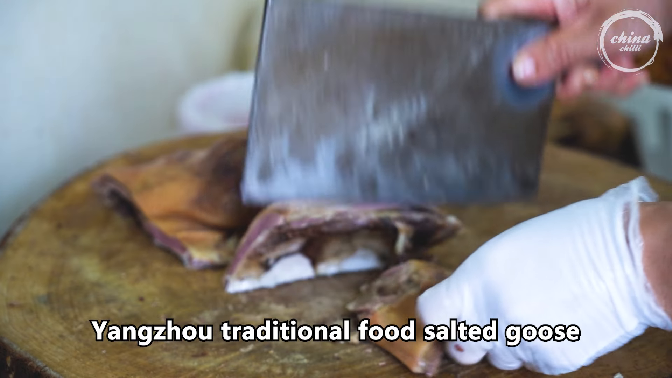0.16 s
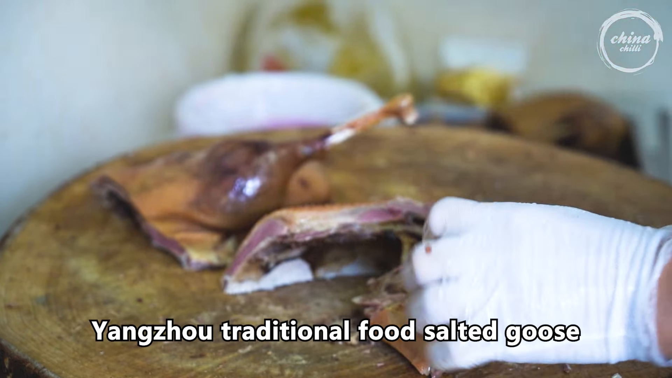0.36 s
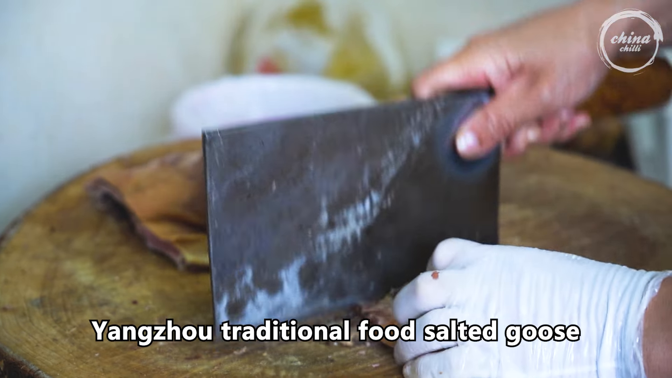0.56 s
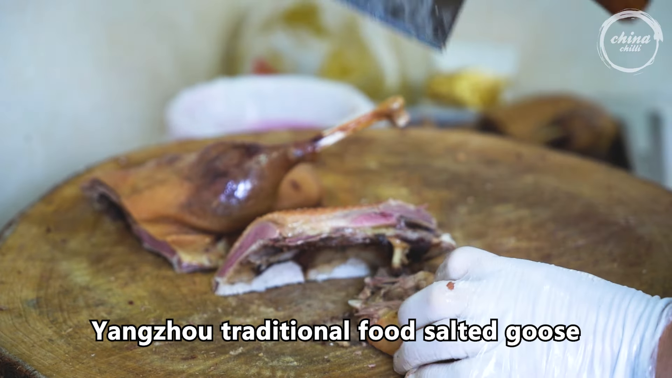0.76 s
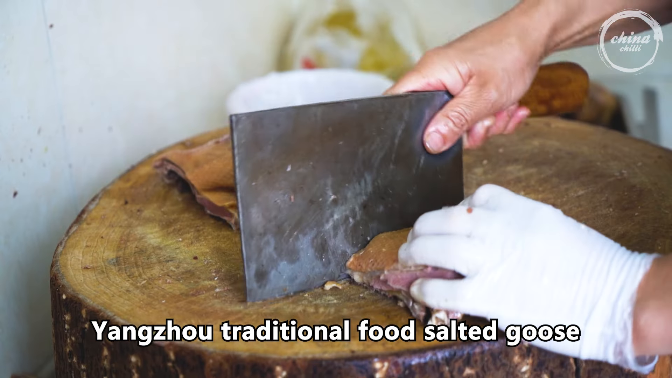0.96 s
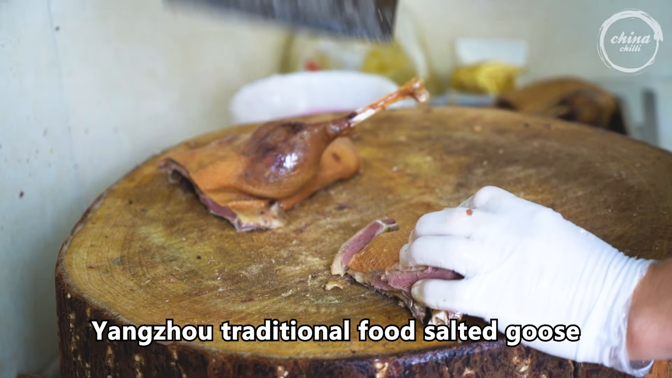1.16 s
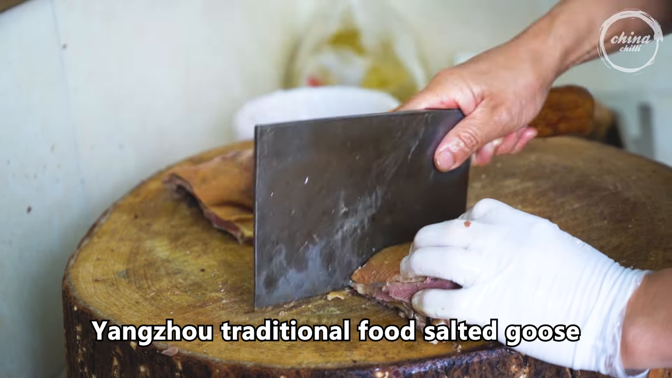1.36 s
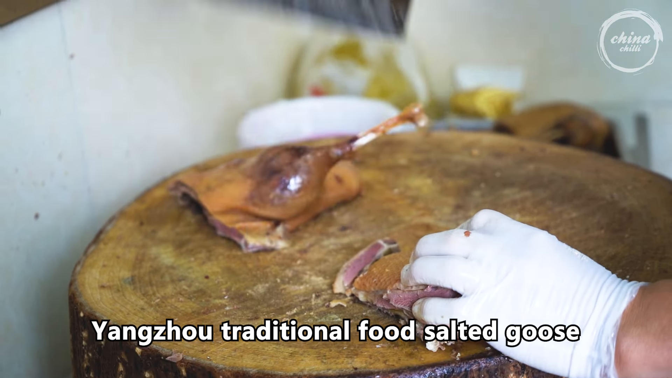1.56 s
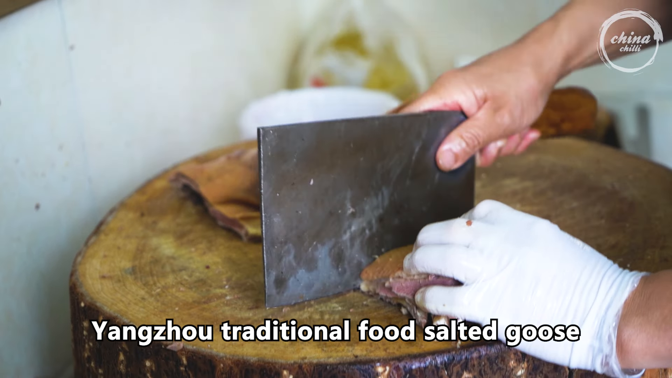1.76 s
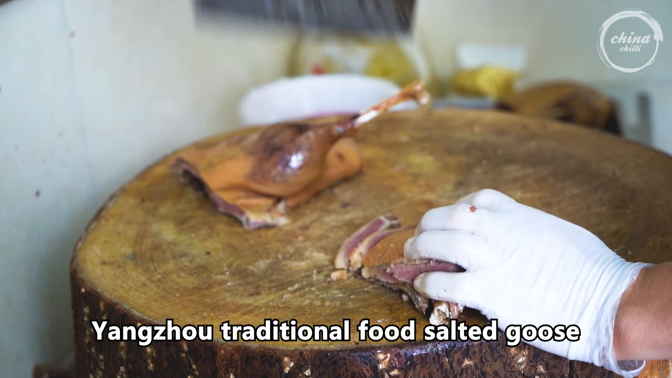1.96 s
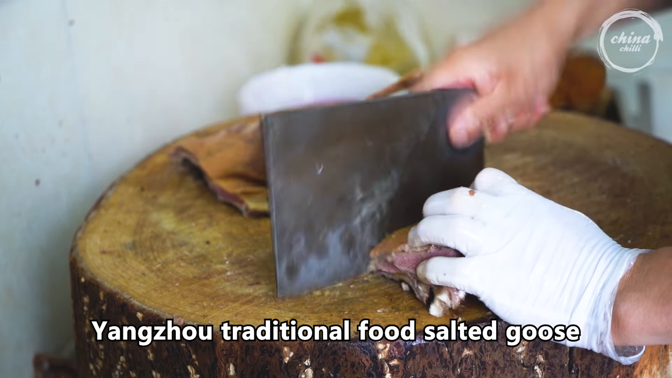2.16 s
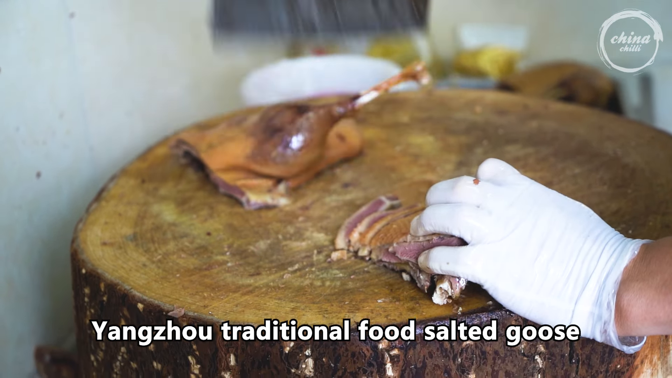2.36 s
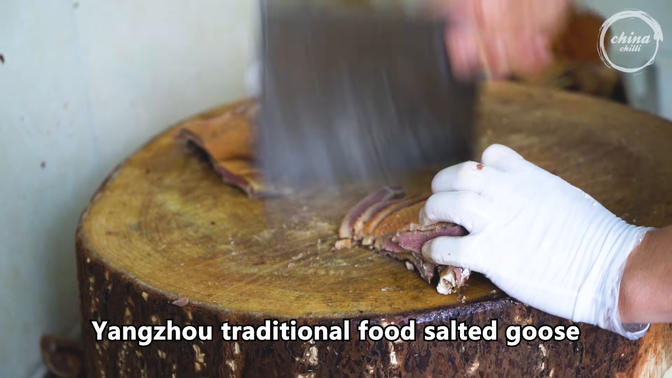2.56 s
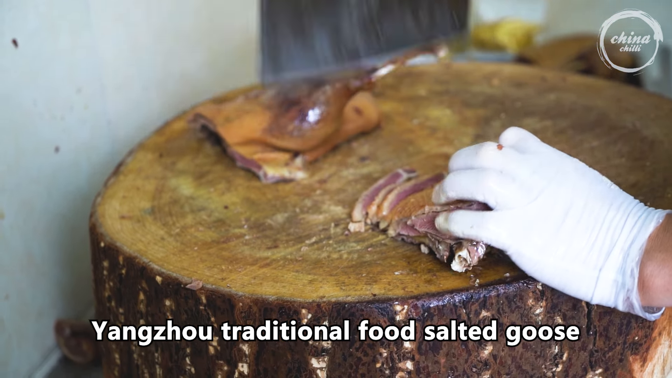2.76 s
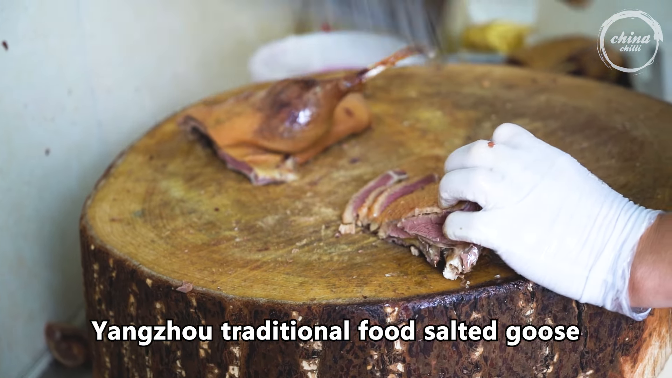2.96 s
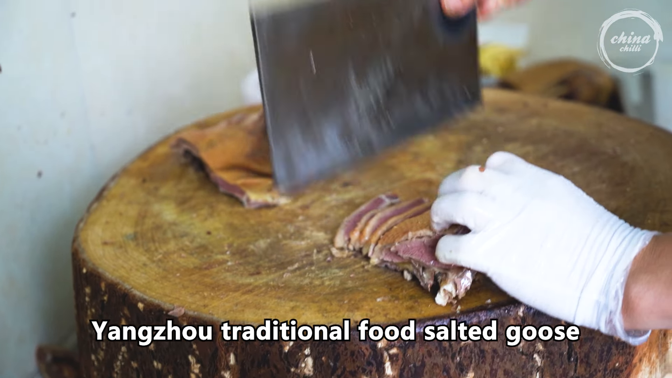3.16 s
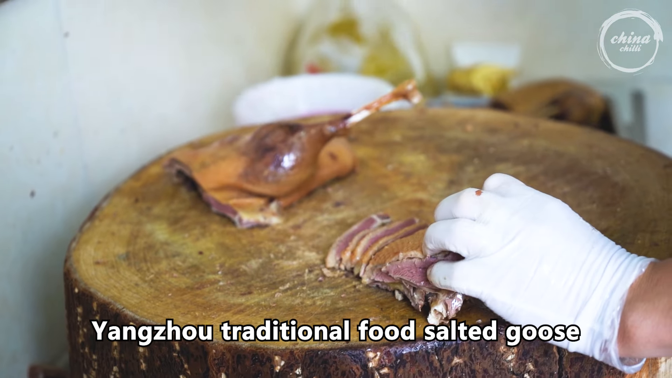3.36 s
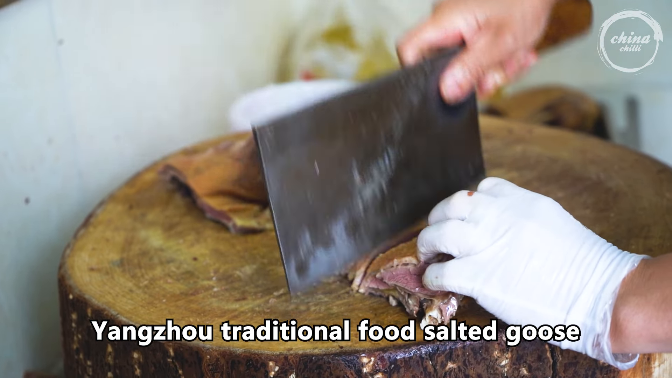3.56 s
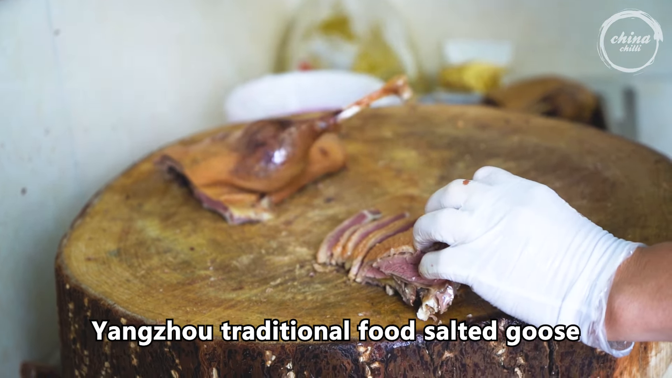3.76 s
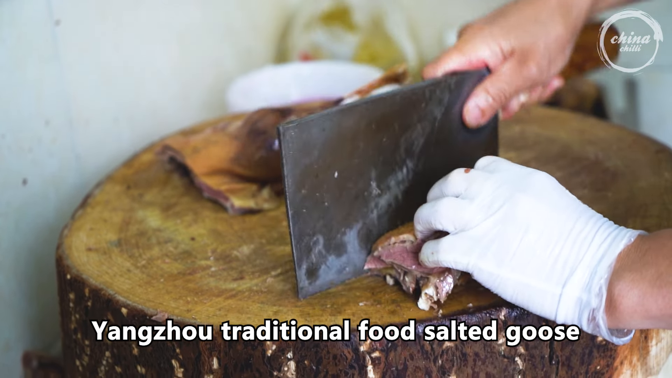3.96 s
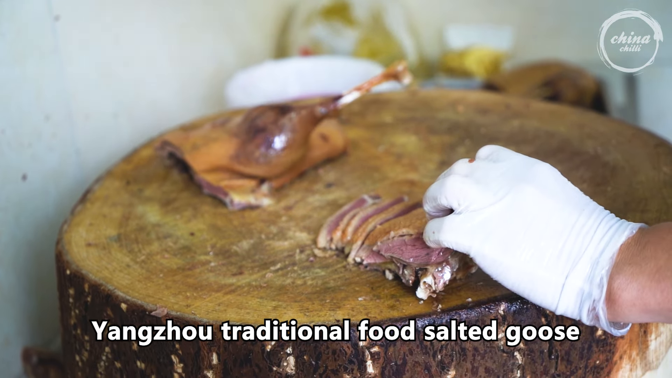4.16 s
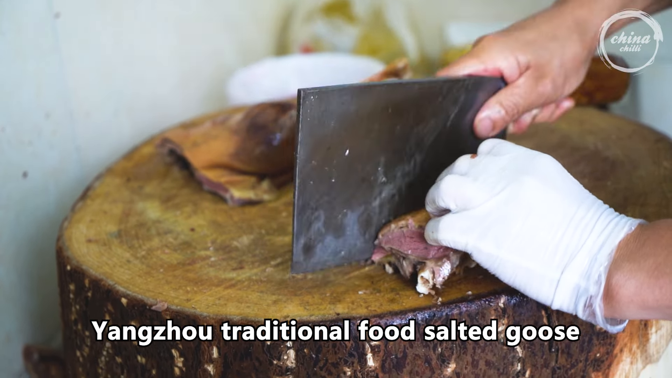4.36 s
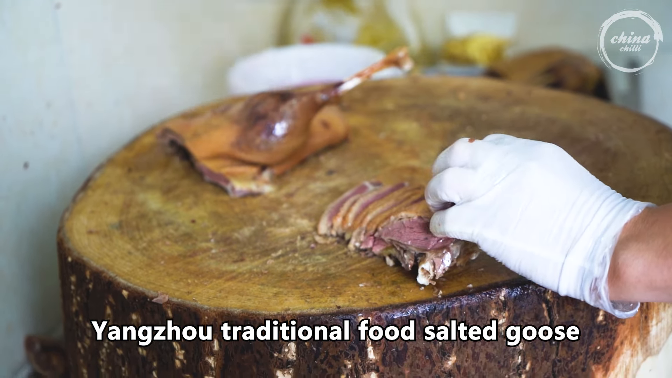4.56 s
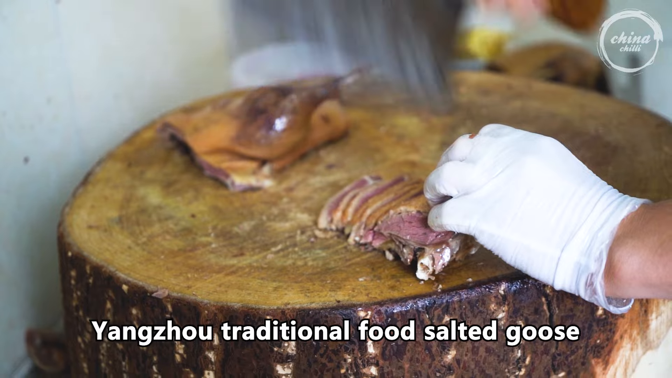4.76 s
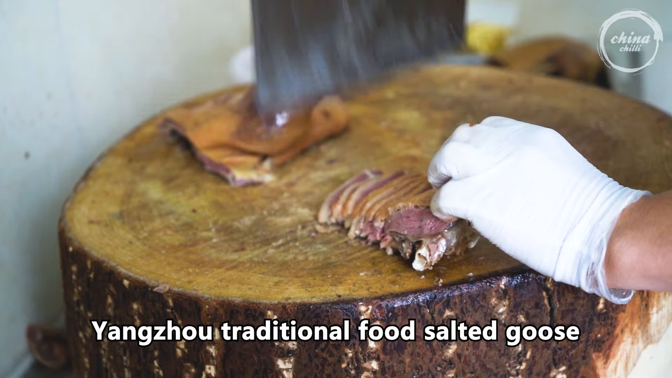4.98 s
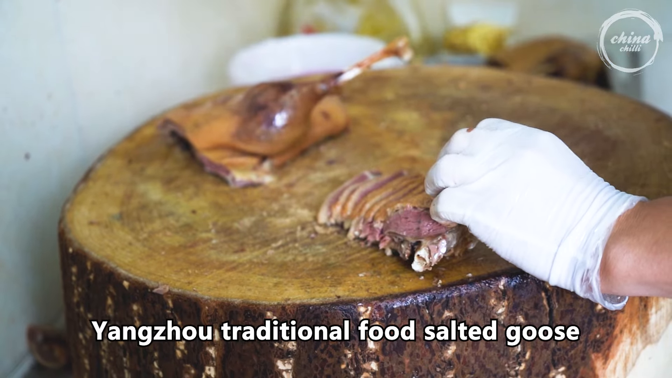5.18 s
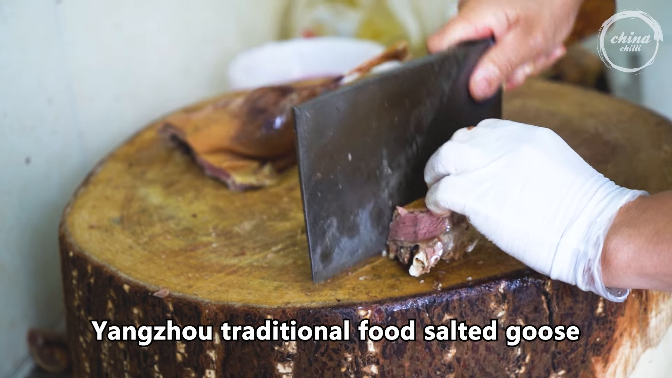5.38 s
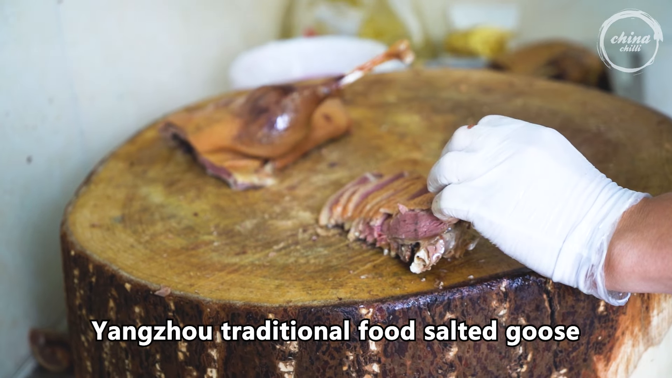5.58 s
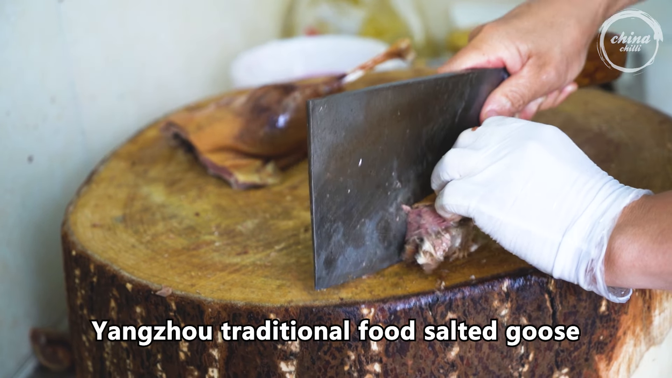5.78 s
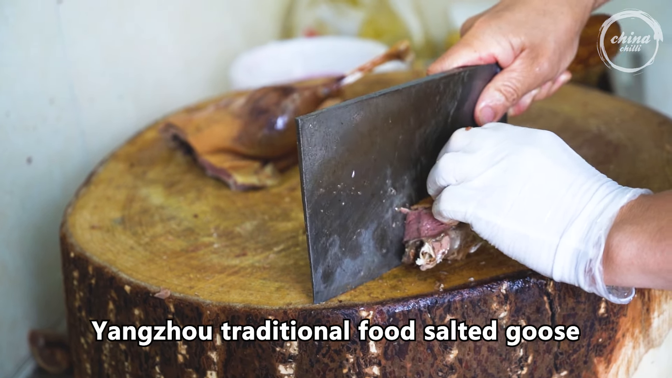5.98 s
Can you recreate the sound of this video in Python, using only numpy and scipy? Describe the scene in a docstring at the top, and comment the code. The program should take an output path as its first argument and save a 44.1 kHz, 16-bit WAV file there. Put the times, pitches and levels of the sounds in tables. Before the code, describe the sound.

A close stereo take in a small hard-walled stall, with a soft, steady bed of air noise. From 0 to 0.4 seconds the lifted blade gives faint thin steel clinks, with a light tap and a wet slide on wood. The first heavy cleaver blow lands at about 0.5, then strokes follow roughly every 0.4 to 0.5 seconds, thirteen in all, the last near 5.8. Each starts with a tiny crunch through meat, then a sharp bone crack and hard knock on the thick block, brief ringing of wood and steel, and echoes gone within about a third of a second. Blows near 1.4 and 2.6 are hollower and woodier; others are brighter and more splintery. Quiet wet rubs and set-downs fall between, most noticeable at 2.8 and from 3.4 to 3.9. The impacts are loud enough to clip.

```python
"""A heavy cleaver chops bone-in goose on a thick wooden block, thirteen strokes in a small hard-walled stall.
Each stroke is shaped noise for the crunch, bone snap and blow, with damped sines for wood and steel.
Around the strokes, swelling wet noise makes pieces set down and slid, and faint sines make the steel clink.
A soft bed of air noise drifts behind. The blows overload a close stereo microphone and clip."""
import sys
import numpy as np
from scipy import signal
from scipy.fft import rfft, irfft, next_fast_len
from scipy.io import wavfile
from scipy.ndimage import map_coordinates

SR = 44100
rng = np.random.default_rng(int(sys.argv[2]) if len(sys.argv) > 2 else 0)


def unload_audio(sound):
    """Save the sound as a 16-bit wav file, at the path given as the first command line argument."""
    columns = np.transpose(np.atleast_2d(sound))
    # keep every value between -1 and 1, then stretch to whole-number steps
    steps = np.round(np.clip(columns, -1, 1) * 32767)
    wavfile.write(sys.argv[1], SR, steps.astype(np.int16))


N = 265482
SPAN = 3 * SR // 4  # samples in one event
LEAD = SR // 20  # samples kept ahead of each contact
T = (np.arange(SPAN) - LEAD) / SR  # time since contact, s
AFTER = np.maximum(T, 0)


def amp(db):
    """Decibels to gain."""
    return 10 ** (np.asarray(db) / 20)


def unit(x):
    """Scale to rms 1."""
    return x / np.sqrt(np.mean(x ** 2) + 1e-20)


def along(points, hz):
    """Read a curve of (Hz, value) points on a log-frequency axis."""
    f, v = np.transpose(points)
    return np.interp(np.log(hz + 1), np.log(f + 1), v)


def hump(f, hz, db, octaves):
    """A bell of db around hz on a log-frequency axis."""
    return db * np.exp(-(np.log2(f / hz) / octaves) ** 2)


def peaked(points, hz, db, octaves):
    """A spectrum with a resonant hump of db added around hz."""
    grid = np.geomspace(points[0][0], points[-1][0], 120)
    return np.transpose([grid, along(points, grid) + hump(grid, hz, db, octaves)])


def splintered(points, depth_db):
    """Roughen a spectrum at random: every piece has its own uneven set of resonances."""
    grid = np.geomspace(points[0][0], points[-1][0], 70)
    return np.transpose([grid, along(points, grid) + depth_db * rng.standard_normal(len(grid))])


def filtered(x, response):
    """Filter x by a response given as a function of frequency."""
    n = x.shape[-1]
    padded = next_fast_len(n + 4096)
    return irfft(rfft(x, padded) * response(np.fft.rfftfreq(padded, 1 / SR)), padded)[..., :n]


def add(track, s, sound):
    """Mix a sound in with its contact at time s."""
    start = round(s * SR) - LEAD
    part = sound[:, max(-start, 0):N - start]
    track[:, max(start, 0):][:, :part.shape[1]] += part


def fade(t60):
    """Die away by 60 dB in t60 seconds after the contact."""
    return np.exp(-np.log(1000) * AFTER / t60)


def grains(rate, depth_db):
    """A crackling gain of rms 1, gliding in dB between random levels set `rate` times a second."""
    knots = rng.standard_normal(SPAN)
    level = np.interp(np.arange(SPAN) * rate / SR, np.arange(SPAN), knots)
    return unit(amp(depth_db * level))


def rush(layers, alike, size=SPAN):
    """Stereo noise made of (spectrum, rms dB) layers; mid and side share it to set left-right likeness."""
    hz = np.fft.rfftfreq(size, 1 / SR)
    power = 0
    for shape, db in layers:
        top_hz = shape[-1][0]
        response = amp(along(shape, hz)) / (1 + (hz / top_hz / 2) ** 2)
        power = power + (amp(db) * unit(response)) ** 2
    turn = np.arccos(np.clip(along(alike, hz), -1, 1)) / 2
    noise = rfft(rng.standard_normal((2, size)))
    mid, side = irfft(noise * np.sqrt(power) * [np.cos(turn), np.sin(turn)], size)
    return np.array([mid + side, mid - side])


# Stereo width of the stall. Each row: frequency in Hz, left-right likeness (1 is identical).
STEREO_LIKENESS = [(60, 0.97), (300, 0.99), (700, 0.77), (1300, 0.41), (2500, 0.033), (8000, 0.017)]


def ring(modes, scatter_db):
    """Damped (Hz, dB, t60) modes at scattered strengths; the less alike the sides, the more phases differ."""
    hz, db, t60 = np.transpose(modes)
    start, skew, strength = rng.standard_normal((len(hz), 3)).T
    spread = skew * np.sqrt(2 * abs(1 - along(STEREO_LIKENESS, hz)))
    phase = np.pi * start + np.array([[.5], [-.5]]) * spread
    gain = amp(db + strength * scatter_db)
    t = AFTER.astype(np.float32)
    angle = np.outer(np.float32(2 * np.pi * hz), t)
    decay = np.exp(np.outer(np.float32(-np.log(1000) / t60), t))
    out = (gain * np.cos(phase)) @ (np.sin(angle) * decay)
    out += (gain * np.sin(phase)) @ (np.cos(angle) * decay)
    return out * (T > 0) / np.sqrt(np.sum(gain ** 2) / 2)


# Wall echo decay. Each row: frequency in Hz, time to fall 60 dB in seconds.
STALL_DECAY = [(60, 0.69), (200, 0.29), (600, 0.35), (2000, 0.31), (6000, 0.33), (10000, .3), (15000, 0.24)]


def reverberate(noise):
    """Dense wall echoes: each frequency dies at its own speed."""
    hz, t, z = signal.stft(noise, SR, nperseg=256)
    age = np.maximum(t - LEAD / SR, 0)
    dying = np.exp(-np.log(1000) * age / along(STALL_DECAY, hz)[:, None])
    return signal.istft(z * dying, SR, nperseg=256)[1][:, :SPAN]


# Spectrum of the air around the stall. Each row: frequency in Hz, relative density in dB per Hz.
AIR_SPECTRUM = [(15, -74), (40, -37), (62, -27), (80, 1), (115, -7.5), (166, -22), (217, -4), (335, -4.5),
                (591, -4), (1520, -3.5), (4030, -11), (7310, -12.5), (14800, -20.5), (16000, -42)]
AIR_DB, AIR_DRIFT_DB, AIR_DRIFT_RATE = -47, -0.35, 1.1  # level, depth of its drift, drifts a second


def background():
    """The soft noise of air around the stall, its level drifting slowly on a random curve."""
    air = rush([(AIR_SPECTRUM, 0)], STEREO_LIKENESS, size=N)
    place = np.arange(N) * AIR_DRIFT_RATE / SR
    drift = map_coordinates(rng.standard_normal(int(place[-1]) + 4), [place])
    return amp(AIR_DB + AIR_DRIFT_DB * drift) * air


# Light clinks of the lifted steel. Each row: start in seconds, pitch in Hz, level in dB,
# time to fall 60 dB in seconds.
STEEL_CLINKS = [(0.0, 619, -41, .5), (0.05, 1612, -46, .65), (0.18, 2824, -43, .8),
                (0.385, 1204, -44.5, .42)]


def clinks():
    """Thin rings of the blade as it is lifted, single damped sines that speak softly and waver."""
    track = np.zeros((2, N))
    for s, hz, db, t60 in STEEL_CLINKS:
        tone = ring([(hz, 0, t60)], scatter_db=0)
        add(track, s, amp(db) * tone * (1 - fade(0.022)) * grains(rate=25, depth_db=-3.0))
    return track


# Spectra of the rub, the wood knock, the edge crack and the wet fizz; strokes reuse the last three.
# Each row: frequency in Hz, relative density in dB per Hz.
RUB_SPECTRUM = [(300, -31), (800, -11), (1300, -2), (2200, 0.5), (3200, -2), (4500, -11.5), (7000, -41)]
KNOCK_SPECTRUM = [(60, -29), (170, -24.5), (230, -15), (320, -12.5), (420, -8), (680, -3.5), (1080, -2.5),
                  (1400, -8), (2500, -40)]
CRACK_SPECTRUM = [(1200, -85), (2800, 0), (4000, -1), (5500, 1), (7200, 1), (8500, -6), (12000, -16.5)]
FIZZ_SPECTRUM = [(5000, -40), (8000, -4.5), (9800, 0), (11500, -7.5), (15500, -8.5)]
# Wood modes of the block and its corner of the stall. Each row: pitch in Hz, relative level in dB.
BLOCK_MODES = [(376, -6), (399, -3.5), (501, -10.5), (560, -4.5), (628, 2), (667, 0.5), (699, 1), (741, -2),
               (790, -23), (838, -42), (898, -9.5), (945, 1.5), (1043, 2), (1095, -2), (1160, -6.5),
               (1228, -4), (1275, -15), (1334, -24), (1401, -19.5), (1539, -26), (1592, -23.5), (1708, 0.5)]
WET_FIZZ_DB = -8.5  # fizz relative to the wet treble


def nudge(db, wood_db, wet_db, scrape_hz, rise_s, t60):
    """A wet rub that swells and dies away, with a soft knock of the block's modes."""
    scrape = splintered(peaked(RUB_SPECTRUM, scrape_hz, db=2.0, octaves=0.35), depth_db=3.0)
    layers = [(scrape, 0), (KNOCK_SPECTRUM, wood_db - 3),
              (CRACK_SPECTRUM, wet_db), (FIZZ_SPECTRUM, wet_db + WET_FIZZ_DB)]
    swell = np.exp(np.minimum(T, 0) * 2 / max(rise_s, .001))
    rub = rush(layers, STEREO_LIKENESS) * swell * fade(t60) * grains(rate=360, depth_db=1.5)
    modes = [(hz, level, .22) for hz, level in BLOCK_MODES]
    knock = amp(wood_db - 2.0) * ring(modes, scatter_db=9) * (1 - fade(0.017))
    return amp(db) * (rub + knock)


# Meat and blade slid over the block. Each row: start in seconds, level in dB,
# then against the rub and before nudge's trims: wood in dB, wet treble in dB.
SLIDE_EVENTS = [(0.106, -32.5, -3.5, -4), (1.766, -45, -19, 3.5), (2.43, -44.5, -9, -34),
                (3.291, -42, -22, 1), (3.42, -31, -27, -2.5), (5.075, -35, -22, -16),
                (5.654, -38, -8.5, -8)]


def slides():
    """Slow slides: the rub swells gradually and dies slowly."""
    track = np.zeros((2, N))
    for s, *touch in SLIDE_EVENTS:
        add(track, s, nudge(*touch, scrape_hz=1730, rise_s=0.054, t60=.85))
    return track


# Pieces set down on the block. Each row: start in seconds, level in dB,
# then against the rub and before nudge's trims: wood in dB, wet treble in dB.
TAP_EVENTS = [(0.002, -36, 0, 3), (0.365, -42.5, 4.5, -6), (0.897, -36, -12, -4), (2.825, -28, -3.5, -11),
              (3.732, -26.5, -1.5, -7), (3.88, -19, -3.5, -9), (4.53, -29, 0.5, -24)]


def taps():
    """Quick set-downs: the rub rises fast and dies soon."""
    track = np.zeros((2, N))
    for s, *touch in TAP_EVENTS:
        add(track, s, nudge(*touch, scrape_hz=1450, rise_s=0.0074, t60=.33))
    return track


# Steel modes of the blade. Each row: pitch in Hz, relative level in dB, time to fall 60 dB in seconds.
BLADE_MODES = [(1910, -12.5, 0.34), (2623, -10, 0.15), (2935, -7, .2), (3830, -5, 0.15), (4940, -24, 0.19),
               (5300, -14, 0.18)]


def blade_ring(ring_db, snap_hz):
    """Blade and bone, wedged together, ring on at the pitch of the snap as a beating pair."""
    wedged = [(snap_hz, 3, .3), (snap_hz + 27, 0, .28)]
    return amp(ring_db - 4.5) * ring(BLADE_MODES + wedged, scatter_db=0.5)


def plate_clank(crack_db, crack_hz):
    """The wedged plate's crowded upper modes, which shift with every bite of the edge."""
    pitches = np.exp(rng.uniform(np.log(1500), np.log(11000), size=26))
    plate = [(hz, hump(hz, crack_hz, db=5.5, octaves=0.62), .26) for hz in pitches]
    return amp(crack_db - 7.5) * ring(plate, scatter_db=10.0)


def wood_ring(knock_db, knock_hz, hollow_db):
    """The block's modes; where and how squarely the edge lands decides which answer."""
    modes = [(hz, level + hump(hz, knock_hz, hollow_db, HOLLOW_OCTAVES), .24) for hz, level in BLOCK_MODES]
    return amp(knock_db - 1.5) * ring(modes, scatter_db=1) * (1 - fade(0.018))


def crunch_through(bright, near, cut_s):
    """Tissue gives way in tiny jerks: it swells as the edge sinks in and stops soon after the wood."""
    sinking = np.clip(1 + T / max(cut_s, .001), 0, 1) ** 0.72 * fade(0.025)
    return amp(-7.5) * rush(bright, near) * sinking * grains(rate=1900, depth_db=5.0)


# Spectra of the low thud and the bone snap. Each row: frequency in Hz, relative density in dB per Hz.
THUD_SPECTRUM = [(15, -2), (40, -20), (75, 6), (140, -17), (300, -0.5), (700, -11)]
SNAP_SPECTRUM = [(300, -34.5), (900, -8.5), (1350, -2.5), (1900, 1.5), (2600, -2), (3500, -4), (6000, -10)]
# a typical stroke, relative to its strength and before the trims of each layer (dB)
KNOCK_DB, SNAP_DB, CRACK_DB, FIZZ_DB, TAIL_DB = -12.5, -12.5, -13, -18, -25.5
HOLLOW_DB, HOLLOW_OCTAVES = 4, 0.31  # typical height and width of the hump at the knock pitch
# a squarer blow knocks louder, and with that is hollower and duller (dB per dB of knock)
HOLLOW_GROWS, TREBLE_FALLS = .8, 0.41


def chop(db, knock_db, thud_db, ring_db, cut_s, knock_hz, snap_hz, crack_hz):
    """One stroke: crunch through the meat, blow on the block, ringing wood and steel, wall echoes."""
    square_db = knock_db - KNOCK_DB
    hollow_db = HOLLOW_DB + HOLLOW_GROWS * square_db
    crack_db = CRACK_DB - TREBLE_FALLS * square_db
    fizz_db = FIZZ_DB - TREBLE_FALLS * square_db
    snap = splintered(peaked(SNAP_SPECTRUM, snap_hz, db=3.5, octaves=0.1), depth_db=1.5)
    crack = splintered(peaked(CRACK_SPECTRUM, crack_hz, db=6, octaves=0.049), depth_db=1.9)
    knock = peaked(KNOCK_SPECTRUM, knock_hz, hollow_db, HOLLOW_OCTAVES)
    bright = [(snap, SNAP_DB), (crack, crack_db), (FIZZ_SPECTRUM, fizz_db)]
    whole = bright + [(knock, knock_db - 7)]
    near = [(500, 0.96), (8000, 1.0)]  # (Hz, left-right likeness): close sound is almost mono

    crunch = crunch_through(bright, near, cut_s)
    # the blow, thickened by the block top and the nearest wall
    blow = amp(3) * rush(whole, near) * fade(0.11) * grains(rate=248, depth_db=5.0)
    echoes = reverberate(rush(whole, STEREO_LIKENESS)) * (1 - fade(0.0095)) * grains(rate=320, depth_db=0.67)
    lingering = [(snap, SNAP_DB), (crack, crack_db + 1), (KNOCK_SPECTRUM, knock_db - 4.0)]
    tail = amp(TAIL_DB) * rush(lingering, STEREO_LIKENESS) * fade(0.9)
    thud = rush([(THUD_SPECTRUM, thud_db)], STEREO_LIKENESS) * fade(0.29)
    wood = wood_ring(knock_db, knock_hz, hollow_db)
    steel = blade_ring(ring_db, snap_hz) + plate_clank(crack_db, crack_hz)
    return amp(db) * (crunch + (blow + echoes + tail + thud) * (T > 0) + wood + steel)


# The strokes. Each row: start in seconds, strength in dB, then relative to it and before layer trims:
# wood knock in dB, thud in dB, blade ring in dB; then time in the meat in seconds,
# knock pitch in Hz, snap pitch in Hz, crack pitch in Hz.
STROKES = [(0.5236, 2.5, -10.5, -47, -14, 0.0094, 1100, 1800, 4020),
           (1.0046, 3.8, -17.5, -45, -23, 0.0074, 1000, 1900, 5550),
           (1.390, 4.05, -6.5, -38, -42, 0.007, 810, 2080, 7260),
           (1.802, 4.05, -15, -38.5, -10.5, 0.0034, 810, 2000, 4650),
           (2.2203, 2.7, -13.5, -64, -15, 0.0048, 1120, 1480, 4060),
           (2.6381, 3.45, -5, -50, -38, 0.0094, 813, 1660, 3940),
           (3.0595, 4.2, -12, -37.5, -39, 0.0034, 960, 2050, 4600),
           (3.499, 4.5, -13.5, -47, -36, 0.0042, 656, 1830, 5300),
           (3.943, 5, -13.5, -37, -22, 0.008, 930, 1680, 4560),
           (4.391, 4, -12.5, -36.5, -23, 0.006, 1100, 2100, 5270),
           (4.8495, 6.5, -12, -51, -21, .005, 1160, 2250, 6970),
           (5.309, 4.2, -10, -33, -14.5, 0.0082, 640, 1800, 3050),
           (5.828, 5.5, -13, -35.5, -22, 0.011, 560, 2700, 3950)]


def chopping():
    """The run of strokes, each landing with its own weight, squareness and pitches."""
    track = np.zeros((2, N))
    for s, *stroke in STROKES:
        add(track, s, chop(*stroke))
    return track


# Left against right. Each row: frequency in Hz, left minus right level in dB.
LEFT_LEVEL = [(100, 0), (400, -0.5), (1300, -2.5), (4000, -1.4), (8000, -4.5), (13000, 0.5)]
# Each row: frequency in Hz, phase by which left leads in radians.
LEFT_LEAD = [(100, 0.23), (500, 0.26), (950, 0.2), (1700, 0.69), (2800, 1.46), (3500, 0.95), (5800, 1.06),
             (9000, 1.26), (15000, 1.7)]


def scene():
    """The block stands slightly off the axis of the microphone, so the sides differ in level and phase."""
    mix = background() + clinks() + slides() + taps() + chopping()
    sides = np.array([[.5], [-.5]])

    def off_axis(hz):
        return amp(sides * along(LEFT_LEVEL, hz)) * np.exp(1j * sides * along(LEFT_LEAD, hz))

    return filtered(mix, off_axis)


TOP_HZ = 16000  # band limit


def record(dry):
    """The blows clip at full scale, then a very steep low-pass cuts the top."""
    return filtered(np.clip(dry, -1, 1), lambda hz: 1 / np.sqrt(1 + (hz / TOP_HZ) ** 120))


dry = scene()
out = record(dry)
unload_audio(out)
```